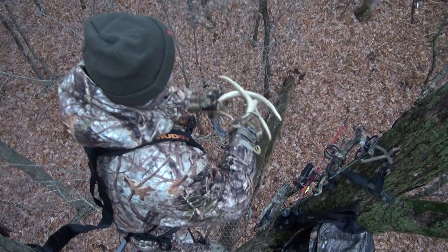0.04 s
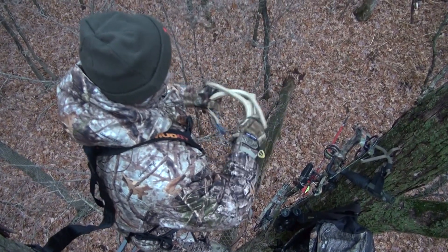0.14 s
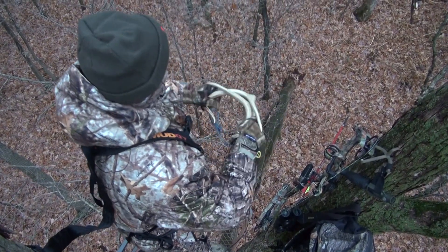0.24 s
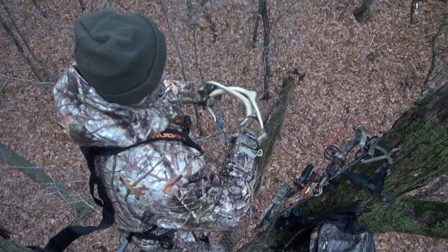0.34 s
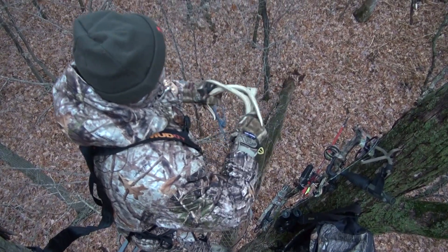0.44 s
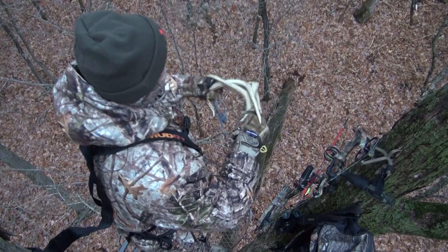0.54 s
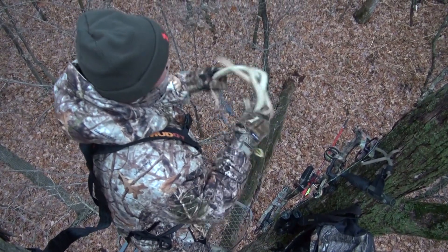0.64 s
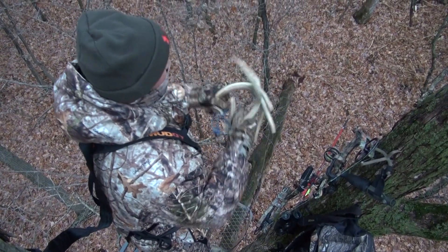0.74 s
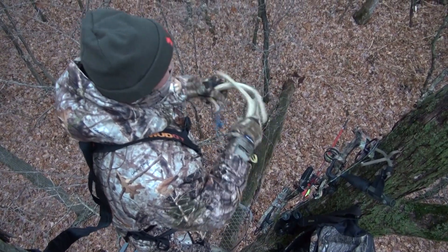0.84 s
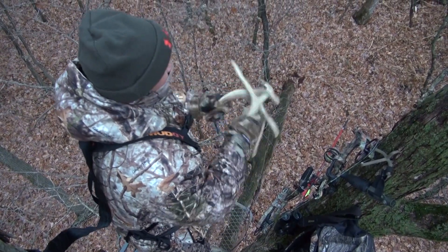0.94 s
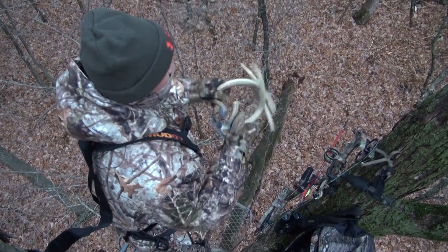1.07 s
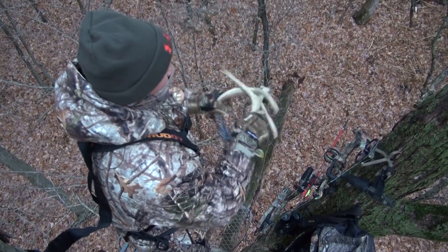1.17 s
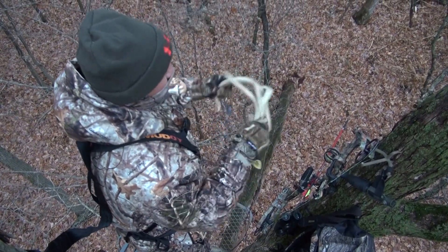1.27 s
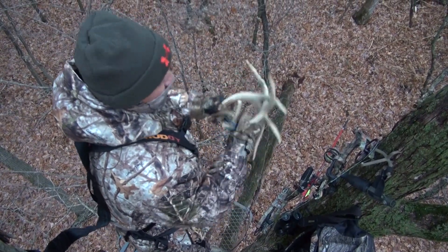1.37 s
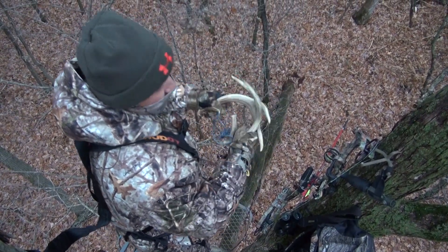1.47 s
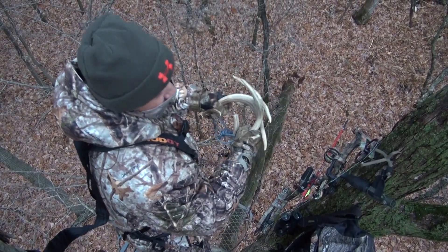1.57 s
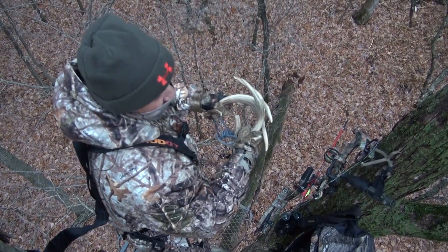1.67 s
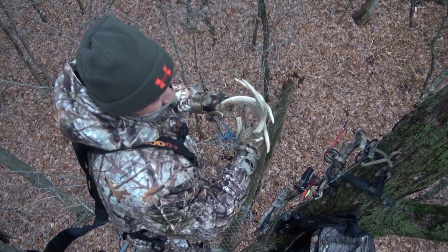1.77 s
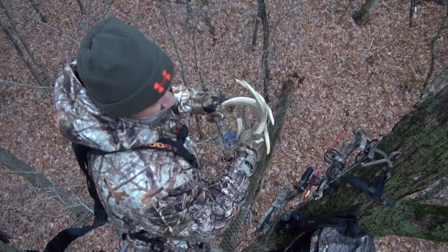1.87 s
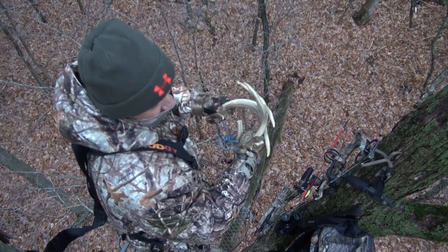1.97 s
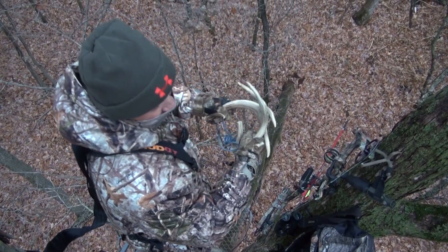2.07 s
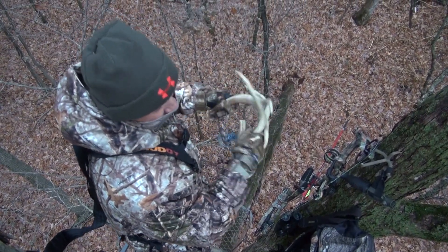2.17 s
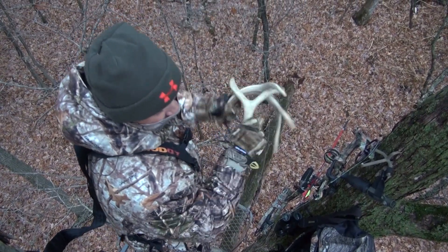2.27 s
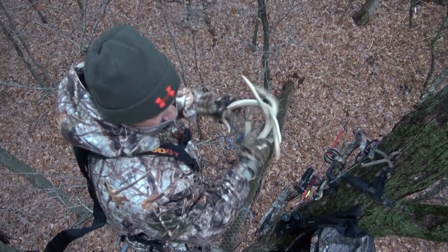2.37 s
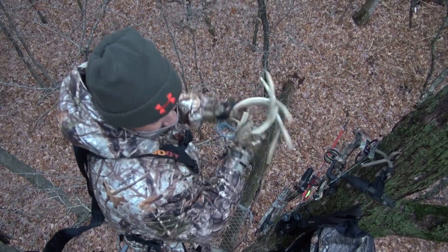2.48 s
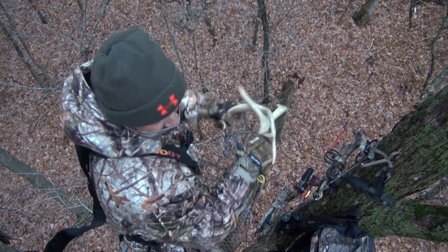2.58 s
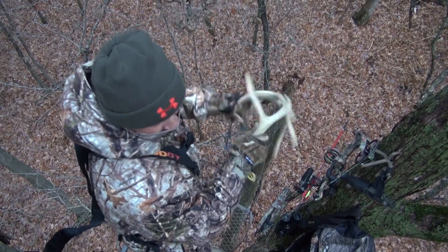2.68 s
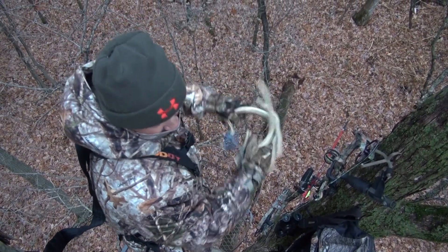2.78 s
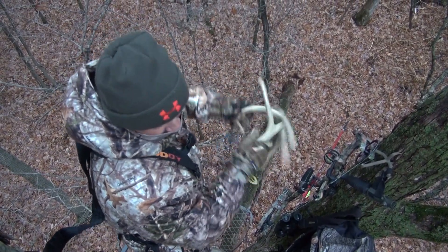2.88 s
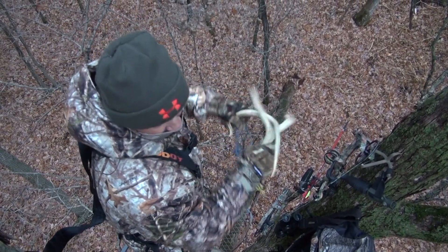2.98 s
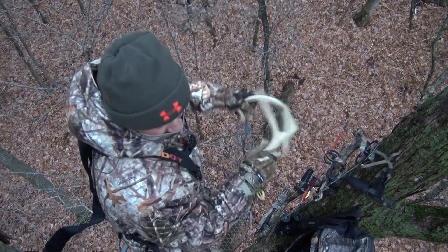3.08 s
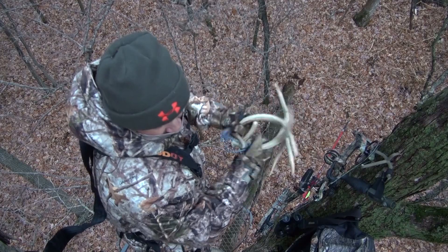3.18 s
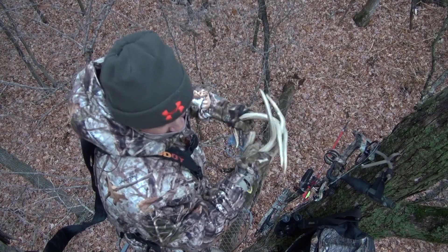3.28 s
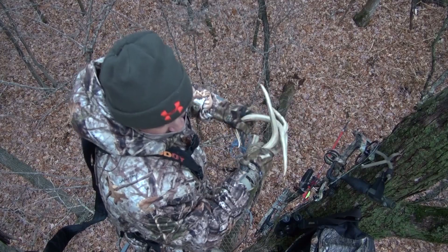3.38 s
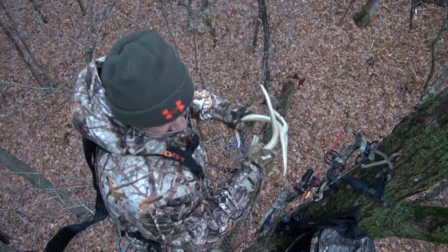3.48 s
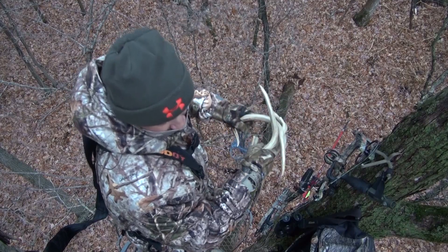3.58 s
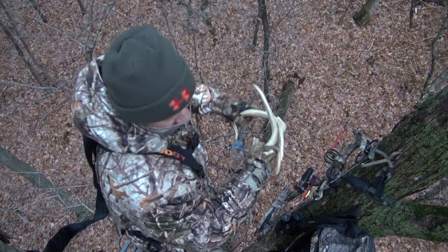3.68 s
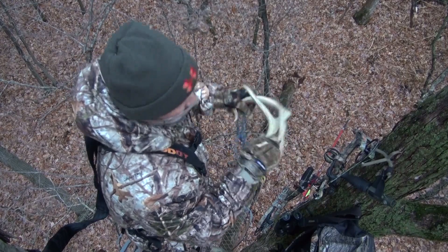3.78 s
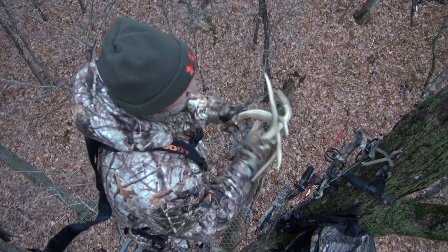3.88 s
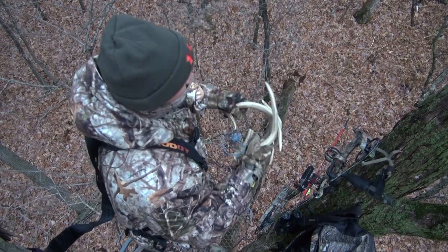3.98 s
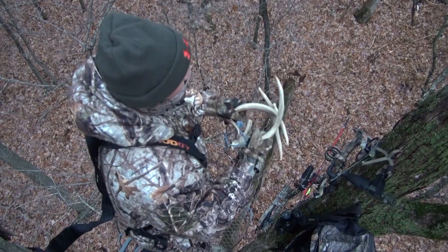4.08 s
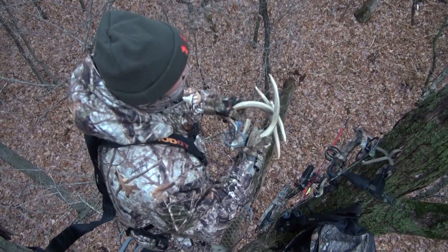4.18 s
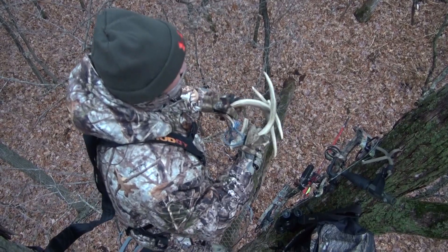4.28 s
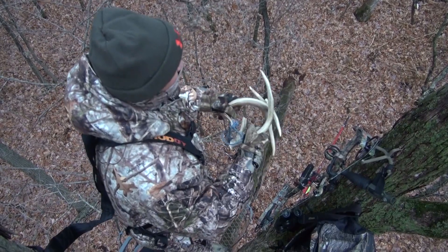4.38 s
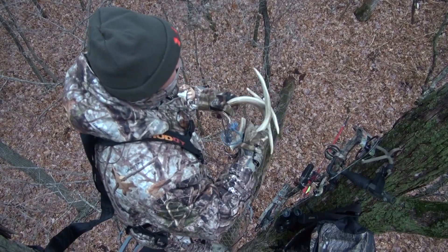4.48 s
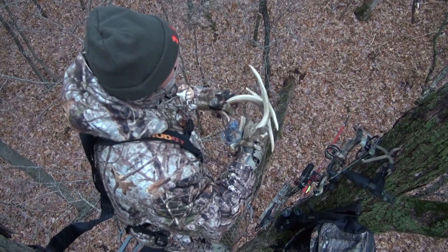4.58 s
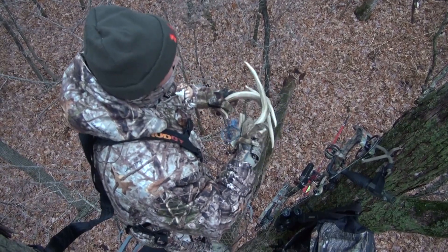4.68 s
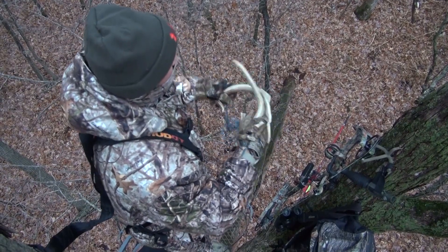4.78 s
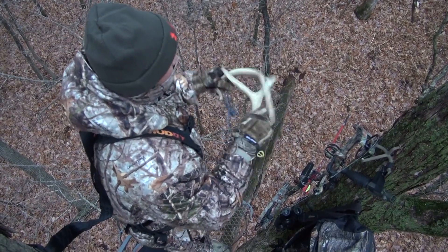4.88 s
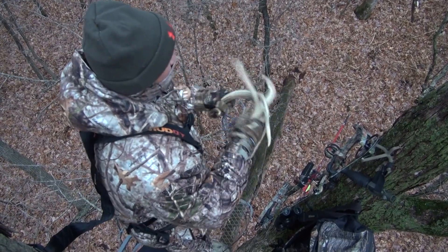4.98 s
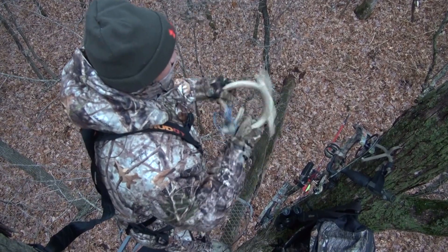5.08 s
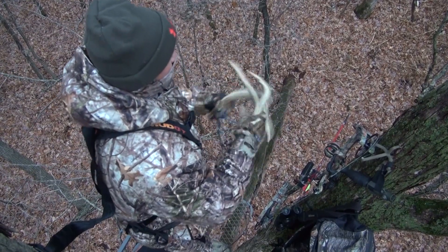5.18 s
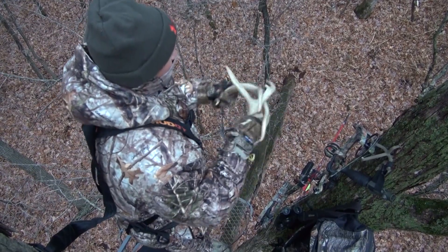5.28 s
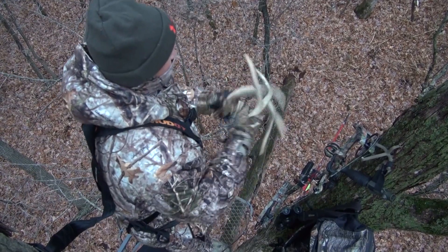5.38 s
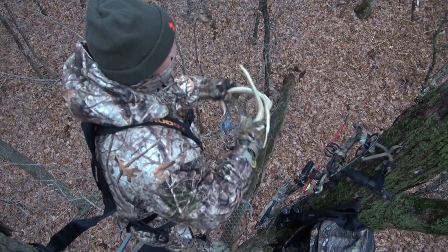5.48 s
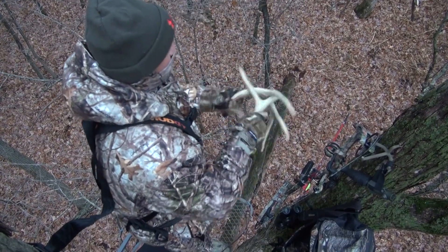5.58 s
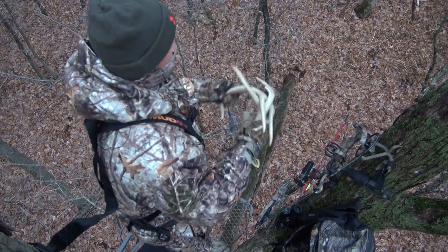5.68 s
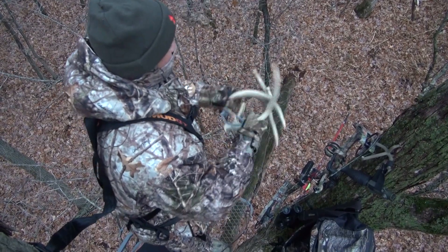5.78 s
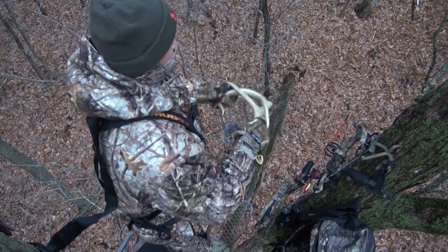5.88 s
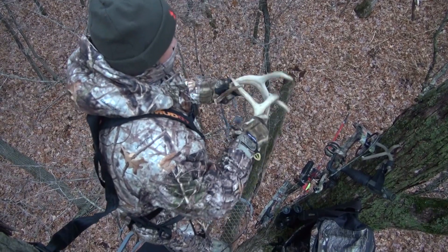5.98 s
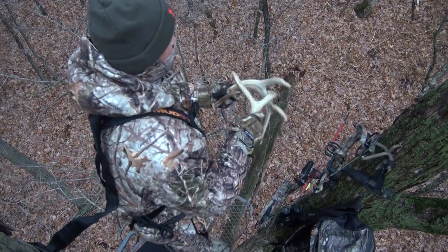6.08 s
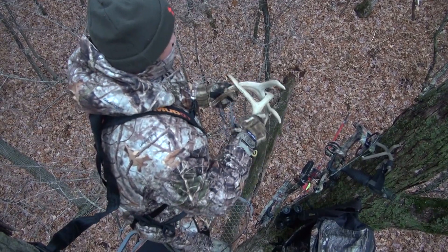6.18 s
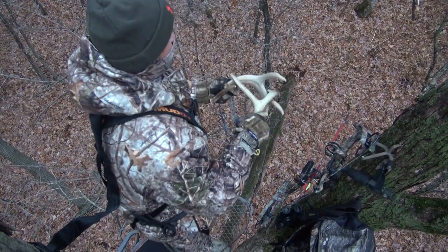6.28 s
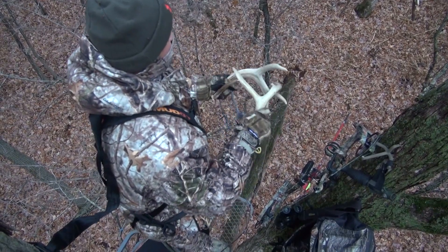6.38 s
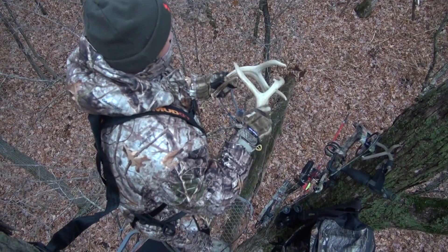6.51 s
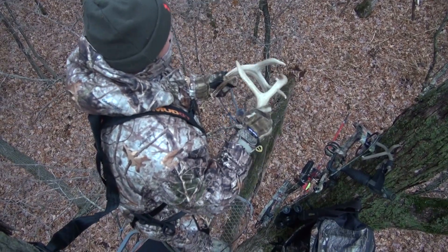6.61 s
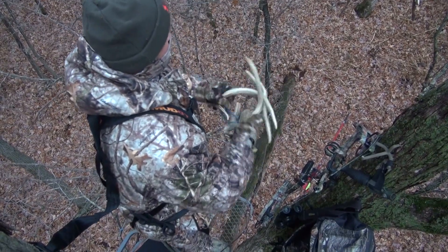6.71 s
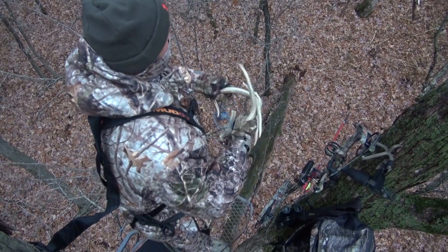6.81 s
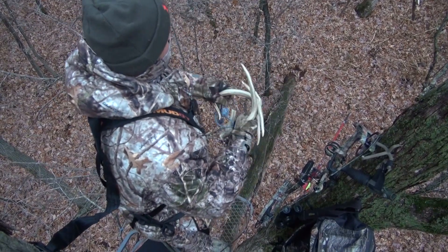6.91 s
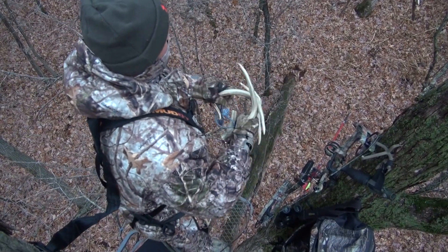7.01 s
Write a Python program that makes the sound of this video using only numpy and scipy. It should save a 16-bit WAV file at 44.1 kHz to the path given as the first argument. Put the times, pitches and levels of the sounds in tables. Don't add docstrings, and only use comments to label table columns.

```python
import sys
import numpy as np
from scipy import signal
from scipy.io import wavfile
from scipy.ndimage import uniform_filter1d

SR = 44100
rng = np.random.default_rng(int(sys.argv[2]) if len(sys.argv) > 2 else 0)


def level_to_linear(level):
    exponent = np.asarray(level, float) / 20
    return 10 ** exponent


def inscribe(sig):
    pcm = np.round(np.clip(np.atleast_2d(sig).T, -1, 1) * 32767)
    wavfile.write(sys.argv[1], SR, pcm.astype(np.int16))


N = 310905


def rms_one(x):
    return x / np.sqrt(np.mean(x ** 2) + 1e-20)


def in_time(rows):
    return np.interp(np.arange(N) / SR, *np.transpose(rows))


def band(x, low_hz, high_hz):
    edges_hz = [low_hz, min(high_hz, .45 * SR)]
    return signal.sosfilt(signal.butter(2, edges_hz, "band", fs=SR, output="sos"), x)


def drift(rate_hz):
    r = np.exp(-80 * np.pi * rate_hz / SR)
    noise = rng.standard_normal(N // 40 + 2002)
    slow = signal.lfilter([1], [1, -2 * r, r * r], noise)[2000:]
    return np.interp(np.arange(N) / 40, np.arange(len(slow)), rms_one(slow))


def coloured(spectrum, patchy_db, rate_hz):
    hz, db = np.transpose(spectrum)
    white = rng.standard_normal((2, N))
    octaves = np.log2(min(hz[-1], SR / 3) / hz[0])
    out = 0
    for k, low_hz in enumerate(hz[0] * 2 ** np.arange(0, octaves, .5)):
        level_db = np.interp(np.log(low_hz) + np.log(2) / 4, np.log(hz), db)
        gain = level_to_linear(level_db + patchy_db * drift(rate_hz))
        out = out + gain * band(white[k % 2], low_hz, low_hz * np.sqrt(2))
    return rms_one(out)


# (time [s], level [dB])
GUSTS = [(0.0, -63), (1.06, -51.5), (1.1, -60), (1.75, -51.5), (2.37, -60.5), (3.57, -61.5), (3.83, -55),
         (4.38, -60.5), (4.42, -41.5), (4.6, -40.5), (4.81, -44), (4.92, -54), (5.3, -63), (5.87, -47),
         (5.99, -63.5), (6.22, -53), (6.81, -53), (7.05, -61.5)]
# (frequency [Hz], density [dB per Hz])
RUMBLE_SPECTRUM = [(8.8, -46.5), (15, -21.5), (50, 1.5), (75, 4), (107, -1.5), (231, -32.5), (336, -38.5),
                   (420, -44.5), (550, -72.5), (920, -120)]


def breeze():
    rumble = coloured(RUMBLE_SPECTRUM, patchy_db=1.5, rate_hz=16)
    rumble = rumble / np.sqrt(uniform_filter1d(rumble ** 2, size=6000))
    return level_to_linear(in_time(GUSTS)) * rumble


# (frequency [Hz], density [dB per Hz])
HISS_SPECTRUM = [(120, -25.5), (200, -13), (340, -16), (700, -23), (1500, -29), (4000, -34.5),
                 (8000, -41.5), (11000, -44.5), (14500, -70.5)]


def woodland_hiss():
    return level_to_linear(-66) * coloured(HISS_SPECTRUM, patchy_db=-2.4, rate_hz=6.6)


def earlier_echo():
    start_db, t60_s = -58.5, 0.27
    fade = level_to_linear(start_db - 60 * np.arange(N) / SR / t60_s)
    return fade * rms_one(band(rng.standard_normal(N), 699, 5200))


# (time [s], level [dB], beam share [dB], tip share [dB], struck tine
# [Hz])
HARD_BLOWS = [(0.0646, -25.5, -3.5, -9.5, 1650), (0.0788, -12, -8, -9, 4150),
              (0.086, -22.5, -4.5, -18, 1677), (0.706, -27.5, 2.5, -22, 2710),
              (0.7107, -19.5, -15.5, -8, 1710), (0.725, -22, -0.5, -11, 3950),
              (0.739, -27, 3.5, -24.5, 3850), (0.7477, -18.5, -6, -10.5, 2360),
              (0.8388, -22, -6.5, -6.5, 2930), (0.8421, -23.5, -3.5, -34, 3080),
              (0.894, -31.5, 2, -8.5, 3160), (0.902, -17, -11.5, -5.5, 3600), (0.9589, -29, 3, -13, 3070),
              (1.019, -18, -4.5, -13, 2730), (1.188, -10.5, -1, -10, 3405), (1.266, -17, -1, -11.5, 3780),
              (1.279, -19, -8, -11.5, 2780), (1.348, -12.5, -20.5, -13, 3910), (1.3548, -19.5, 6, 1, 3310),
              (1.3626, -13.5, -21, -14.5, 2795), (1.39, -26, -8, -11.5, 4830),
              (1.4085, -11, -21.5, -4.5, 5200), (1.4171, -15.5, -6, -6.5, 1857),
              (2.3056, -12.5, -13, -16, 2876), (2.398, -17.5, -2, -4.5, 1219),
                (2.424, -25.5, 2, -13, 1357), (2.433, -26, -5.5, -9.5, 1880),
                (2.5462, -25, -6.5, -18, 2461), (2.5698, -14.5, -0.5, -5, 1140),
                (2.6234, -21.5, -12.5, -13.5, 1140), (2.6563, -22.5, -5, -14, 1140),
                (2.6785, -30, 7.5, 3, 5210), (2.7634, -18, -4, -27.5, 3296), (2.7715, -9.5, -7.5, -5, 3695),
                (2.9686, -14.5, -3, -12.5, 3103), (3.0418, -26, 7.5, -6.5, 1200),
                (3.0601, -21.5, -9, -2.5, 4644), (3.0748, -14, -3, -6.5, 2885),
                (3.103, -19.5, -13.5, -2.5, 5690), (3.185, -11, -12.5, -0.5, 4245),
                (3.1995, -16.5, -8.5, -4.5, 3223), (3.213, -17, -14, -11, 3523),
                (3.8944, -21, 3.5, -7.5, 3130), (3.901, -17, -14.5, -60.5, 2830),
                (3.9112, -14, 3.5, -5, 3764), (3.921, -11, -13, -12, 3214),
                (3.995, -18.5, -4.5, -10.5, 3010),
              (5.0015, -8.5, -1.5, -8, 2660), (5.016, -26.5, 2.5, -7, 1210),
               (5.0593, -20, -2, -11.5, 3790), (5.0723, -22, -5, -11, 1980), (5.0865, -25.5, 2, -4, 3020),
               (5.1488, -21, -5.5, -3, 4780), (5.166, -23.5, -23, -7, 2790), (5.1931, -19, 3.5, 3, 3310),
               (5.2049, -16, -7, -19, 3920), (5.2229, -17.5, -19, -13, 1140), (5.2305, -15, 7, -16, 3270),
               (5.2585, -12, -2, -11.5, 2950), (5.4449, -14, -3.5, -5, 5340),
               (5.598, -12.5, -2.5, -6.5, 4070), (5.716, -21, -4.5, -13, 2780),
               (5.721, -23.5, -14, -13, 2230), (6.0152, -25.5, -9.5, -4, 2180),
               (6.0709, -27, 6.5, -10, 1108), (6.1222, -27.5, -3, -7.5, 3050),
               (6.133, -28.5, -4, -40.5, 2787), (6.714, -16, -2, -3.5, 3825),
               (6.7224, -19, -0.5, -3.5, 3240), (6.73, -10.5, -4, -8, 3540),
               (6.7428, -7.5, 1.5, -11.5, 3017)]
# (time [s], level [dB],
# struck tine [Hz])
LIGHT_TOUCHES = [(0.0118, -50, 4440), (0.1675, -44.5, 1390), (0.211, -47.5, 1256), (0.643, -45.5, 1398),
                 (0.679, -46, 2274), (0.805, -39.5, 2965), (0.824, -41, 4280), (0.864, -43.5, 2840),
                 (0.873, -34, 3810), (0.979, -32.5, 3107), (1.0735, -32.5, 4000), (1.0919, -40.5, 3145),
                 (1.1297, -46, 4810), (1.1428, -36.5, 2030), (1.161, -38, 1686), (1.18, -41, 2214),
                 (1.212, -48.5, 1330), (1.317, -36, 3307), (1.3992, -33.5, 1308), (1.484, -43, 1410),
                 (2.2503, -36.5, 4340), (2.27, -39.5, 4750), (2.327, -26.5, 1710), (2.37, -40.5, 1460),
                (2.3779, -35.5, 1770), (2.3835, -31.5, 1000), (2.5517, -34, 2600), (2.5545, -22.5, 2780),
                (2.6622, -39.5, 1220), (2.698, -31, 5200), (2.7093, -34.5, 5730), (2.7402, -32, 2130),
                (2.7537, -30.5, 1740), (2.7943, -23, 3260), (2.8535, -42.5, 3960), (2.9099, -36.5, 1184),
                (2.9585, -40, 1140), (2.9835, -51, 1350), (3.023, -49.5, 2780), (3.0493, -36.5, 3600),
                (3.1219, -22, 4350), (3.1632, -24.5, 2780), (3.174, -25.5, 4750), (3.219, -30, 3840),
                (3.3151, -48, 1286), (3.5395, -52, 757), (3.7751, -50.5, 1290), (4.0829, -40.5, 1420),
                 (4.836, -40.5, 4500), (4.8513, -43, 1387), (5.0254, -23.5, 1150), (5.098, -30.5, 2920),
               (5.1108, -44.5, 3010), (5.1714, -33, 2990), (5.269, -23, 2770), (5.341, -58.5, 1000),
               (5.3622, -33, 2140), (5.3821, -35, 1100), (5.411, -51.5, 990), (5.431, -30.5, 2710),
               (5.464, -29.5, 4624), (5.5033, -36.5, 1720), (5.5355, -34.5, 3730),
                 (5.653, -30, 1190), (5.6739, -41.5, 2920), (5.677, -28, 2460), (5.7275, -30.5, 1360),
              (5.7444, -37, 2780), (5.771, -31, 5460), (5.788, -37.5, 2000), (5.8167, -41.5, 1410),
              (5.8221, -32.5, 2720), (5.8366, -37.5, 1265), (5.844, -42.5, 1303), (5.89, -42.5, 1186),
              (5.9002, -41, 1390), (5.9582, -42, 3740), (5.9707, -45.5, 2780), (6.0371, -34, 2800),
              (6.054, -42, 2530), (6.0586, -32.5, 2780), (6.0872, -32.5, 1200), (6.2848, -35.5, 1223),
              (6.2963, -40, 3010), (6.493, -62, 2820), (6.7537, -23.5, 1824),
                 (0.2266, -56, 1520), (0.986, -54.5, 1140), (1.2262, -41, 1300), (2.9207, -44, 1236),
                 (2.989, -46, 3080), (5.3184, -43, 894), (5.5155, -62, 770), (5.552, -48, 1070),
                 (5.8855, -41.5, 1370), (5.912, -44, 1148), (5.9203, -62, 1190), (6.1564, -48.5, 1190),
                 (1.0969, -43.5, 2803), (1.1462, -42.5, 2004), (2.346, -43, 1730), (2.395, -37.5, 2180),
                 (2.9934, -33, 3010), (5.7553, -31.5, 2780), (5.7931, -43.5, 2150), (6.0296, -35.5, 2780),
                 (6.0648, -37.5, 2150), (5.807, -46.5, 1353), (3.209, -23.5, 3800), (6.727, -18.5, 2780),
                 (5.0132, -22, 3800)]


def contacts():
    light = LIGHT_TOUCHES
    s, level_db, tine_hz = np.transpose(light)
    beam_db = -1 - 0.195 * (level_db + 35)
    tip_db = -13 + 5.5 * np.log2(tine_hz / 2000) - 0.28 * (level_db + 35)
    blows = np.transpose(HARD_BLOWS)
    return np.hstack([blows, [s, level_db, beam_db, tip_db, tine_hz]])


def favoured(hz, struck_hz):
    return np.exp(-(np.log(hz / struck_hz) / 0.054) ** 2)


# (frequency [Hz], level [dB], t60 [s])
BONE_MODES = [(346.5, -17.5, 0.12), (483, -14, 0.032), (667, -19, 0.035), (788.8, -6, 0.044),
              (963, -5, 0.034), (1140, -3, 0.045), (1335.5, -2.5, 0.036), (1460, -12.5, 0.073),
              (1739, -1.5, 0.031), (1985, -6.5, 0.031), (2160, -6, 0.045), (2446, -10, 0.025),
              (2780, -2, 0.028), (3010, -1.5, 0.034), (3310, 0, 0.016), (3830, -1, 0.017), (4194, 2, 0.016),
              (4721, 2.5, 0.018), (5250, -3.5, 0.013), (5435, 3, 0.012), (6170, -2.5, 0.015),
              (6450, -4.5, 0.015), (7080, -8.5, 0.022), (8400, -21.5, 0.0094), (9100, -23, 0.0057),
              (9400, -21, 0.005)]


def struck_modes(beam_db, tip_db, tine_hz, other):
    hz, mode_db, t60_s = np.transpose(BONE_MODES + BONE_MODES)
    first = np.arange(len(hz)) < len(BONE_MODES)
    low = np.clip(np.log(2000 / hz) / .5, 0, 1)
    high = np.clip(np.log(hz / 3800) / .4, 0, 1)
    middle = (hz > 1500) & (hz < 4500)
    chance = rng.standard_normal((4, len(hz), 1))
    strength, tuning, damping, phase = np.clip(chance, -1.7, 1.7)
    parts = [(tine_hz, 10.5, first)]
    if other is not None:
        parts += [(*other[1:3], ~first), (*other[3:5], ~first)]
    struck_db, owned, tuned_hz = 0, 0, hz * (1 + 0.014 * tuning[:, 0])
    for part_hz, part_db, antler in parts:
        owns = antler * favoured(hz, part_hz)
        struck_db = struck_db + 1.177 * part_db * owns
        owned = owned + owns * np.clip(part_db / 9, 0, 1)
        tuned_hz = tuned_hz * (part_hz / tuned_hz) ** owns
    owned = np.minimum(owned, 1)
    share = level_to_linear(mode_db - 4.0 * strength[:, 0] * owned + struck_db)
    share = share / np.sqrt(np.sum(share[middle] ** 2))
    share = share * level_to_linear(low * (1 - 0.51 * owned) * (beam_db + 3.0) + high * (tip_db + 3.0))
    pitch = np.float32(2 * np.pi * tuned_hz[:, None])
    linger = 1 + .9 * (low + 0.14) * owned
    decay = np.float32(np.log(1000) / ((t60_s * linger)[:, None] * np.exp(.25 * damping)))
    return share, pitch, decay, np.float32(4 * phase), low


def skidding(level_db):
    when, size = rng.random((2, 8))
    drag_s = .02 * level_to_linear(-.2 * (level_db + 10.5))
    skid = np.zeros(SR // 20)
    at = np.minimum((when * drag_s * SR).astype(int), len(skid) - 1)
    skid[at] = level_to_linear(-1.5 - 6.4 * size - 31.6 * when) * np.sign(size - when)
    skid[0] = 1
    return skid


def contact_crack(t, grit, rise, tip_db):
    fade = np.exp(-np.log(1000) * t / 0.017) + level_to_linear(-3.5) * np.exp(-t / 0.00077)
    return level_to_linear(tip_db + 1.0) * grit * rise * fade


def bone_ring(t, grit, rise, level_db, modes, skid):
    share, pitch, decay, phase, low = modes
    hits = np.flatnonzero(skid)
    summed = np.abs(np.exp(-1j * pitch * hits / SR) @ skid[hits])
    share = share * np.sqrt(np.sum(skid ** 2)) / np.maximum(summed, .45)
    sines = np.exp(-decay * t) * np.sin(pitch * t + phase)
    beams, tines = [share * low, share * (1 - low)] @ sines
    choke_s = 0.035 * level_to_linear(-1.27 * (level_db + 9.5))
    choke = np.exp(-(t / choke_s) ** 2)
    flutter = np.minimum(t / .02, .5) * rms_one(uniform_filter1d(grit[::-1], size=100))
    return rise * choke * (beams + tines * (1 + flutter))


# (time [s], beam mode [Hz], beam gain [dB], tine [Hz], tine gain
# [dB])
OTHER_ANTLER = [(0.065, 1672, 7, 3100, 10.5), (0.079, 1196, 10.5, 3070, -1.5), (0.086, 1200, 1, 3770, 2),
                (0.706, 1704, 2.5, 3120, -1.5), (0.711, 1580, 2, 2730, 9), (0.726, 1460, 8.5, 3010, 4.5),
                (0.738, 1460, 1.5, 3020, 6.5), (0.748, 890, -6, 2900, -0.5), (0.839, 1260, 3.5, 3240, 7),
                (0.844, 1073, -0.5, 2060, 2.5), (0.894, 1732, 7, 3830, 3.5), (0.901, 1165, 7, 2720, 6),
                (0.96, 1719, 7, 2745, 4), (1.019, 1383, 10, 2330, 8), (1.188, 1345, 6, 2970, 3),
                (1.265, 1460, 5.5, 2900, 0.5), (1.279, 1140, 4.5, 3700, 4.5), (1.348, 1633, -4.5, 2870, 4),
                (1.353, 1000, -3, 3700, 4), (1.363, 1760, 4.5, 3100, 5), (1.39, 1150, 1, 2950, -1),
                (1.408, 1791, 14.5, 2145, 10), (1.416, 1365, 2.5, 2270, 9),
                (2.307, 1686, -2.5, 2113, 4), (2.398, 1733, 3, 4118, 6.5), (2.424, 806, -3.5, 3210, 2.5),
                (2.432, 1720, 0, 2246, 5.5), (2.547, 1197, 1, 2750, 1.5), (2.57, 1397, -5, 3760, 11),
                (2.623, 1725, 4, 3010, 10), (2.656, 779, 11.5, 2780, 7), (2.679, 1140, 3, 3746, 2.5),
                (2.763, 1135, 9, 2198, 9.5), (2.772, 1368, 6, 4338, 13), (2.969, 1190, 8.5, 2060, 4),
                (3.042, 1090, 3.5, 3990, 10), (3.06, 1140, 7, 3698, 6.5), (3.075, 1620, 3.5, 2840, 6),
                (3.103, 1140, 7, 3060, 2), (3.185, 1300, -4.5, 3124, 2.5), (3.2, 1344, 0, 4565, 2),
                (3.213, 1415, 7, 3066, 8.5), (3.894, 1092, 0.5, 2000, -7), (3.901, 1100, -2, 2128, 13.5),
                (3.911, 1290, -12.5, 3010, 10.5), (3.921, 1665, 5.5, 3840, 5),
                (3.995, 1834, 15.5, 3770, -1.5),
                (5.002, 1704, 6.5, 2144, 8), (5.015, 1280, -2, 2128, 15), (5.059, 1400, 4, 2770, 3),
               (5.072, 1800, 6, 2980, -1), (5.086, 1813, 11, 2770, 13), (5.149, 1694, 9, 3600, 14),
               (5.165, 1723, 11, 3094, 12), (5.193, 1680, 12, 3900, 13), (5.205, 1000, 17, 3420, 6),
               (5.223, 970, -2, 2160, 7), (5.232, 1764, 10, 3230, 20.5), (5.258, 1380, 0, 3892, 12.5),
               (5.444, 1331, 2, 2710, 12), (5.598, 1700, 9, 2270, 26), (5.716, 801, 7, 2160, 8.5),
               (5.72, 1686, 24, 2680, 23), (6.015, 968, 5.5, 2247, 11), (6.071, 838, 13, 2665, 9.5),
               (6.122, 1840, 30, 2200, 0), (6.133, 1147, 7, 2090, -1), (6.714, 1098, 5.5, 4660, 5.5),
               (6.724, 1129, 7, 2915, 7), (6.73, 1590, 1.0, 2780, -3), (6.742, 1685, 6.5, 3210, 4.5)]


def clashes():
    others = OTHER_ANTLER
    t = np.arange(SR // 14, dtype=np.float32) / SR
    rings, cracks = np.zeros(N + SR), np.zeros(N + SR)
    for k, (s, level_db, beam_db, tip_db, tine_hz) in enumerate(contacts().T):
        at = int(np.round(s * SR))
        other = others[k] if k < len(others) else None
        modes = struck_modes(beam_db, tip_db, tine_hz, other)
        rise = 1 - np.exp(-t / (0.000064 * level_to_linear(-.35 * (level_db + 4.5))))
        grit = rng.standard_normal(len(t))
        skid = skidding(level_db)
        crack = contact_crack(t, grit, rise, tip_db)
        ringing = bone_ring(t, grit, rise, level_db, modes, skid)
        cutoff_hz = min(11000 * level_to_linear(0.31 * (level_db + 26.5)), SR / 2.25)
        soft = signal.butter(2, cutoff_hz, fs=SR, output="sos")
        ringing, crack = signal.sosfilt(soft, [ringing, crack])
        for layer, sound, later_db in ((rings, ringing, 0), (cracks, crack, -8.5)):
            sound = signal.fftconvolve(sound, np.r_[1, level_to_linear(later_db) * skid[1:]])
            layer[at:at + len(sound)] += level_to_linear(level_db + 2.0) * sound
    return band(band(rings[:N], 480, 14000), 250, 18000), band(cracks[:N], 840, 8300)


def ring(clicks, hz, t60_s):
    r, w = level_to_linear(-60 / (max(t60_s, .003) * SR)), 2 * np.pi * hz / SR
    return signal.lfilter([0, np.sin(w)], [1, -2 * r * np.cos(w), r * r], clicks + 1e-18)


# (time [s], level [dB])
RUB_STROKES = [
    [(0.05, -62.5), (0.2, -67), (0.3, -81)],
    [(0.6, -57), (0.684, -69.5), (0.822, -47.5), (0.898, -53.5), (1.02, -53)],
    [(1.06, -55.5), (1.234, -45), (1.3, -37), (1.338, -43.5), (1.456, -61), (1.52, -71)],
    [(2.22, -63), (2.314, -64), (2.456, -47.5), (2.52, -62)],
    [(2.56, -57), (2.694, -47.5), (2.792, -45.5), (2.93, -58.5)],
    [(2.97, -46), (3.082, -44), (3.154, -55.5), (3.294, -69.5), (3.35, -71)],
    [(3.88, -71.5), (4.022, -58.5), (4.14, -65)],
    [(5.0, -70), (5.05, -72.5), (5.17, -46), (5.27, -35)],
    [(5.29, -45.5), (5.43, -46)],
    [(5.46, -50), (5.59, -59.5)],
    [(5.62, -38), (5.7, -59.5)],
    [(5.73, -57.5), (5.87, -45.5)],
    [(5.882, -43), (5.98, -71)],
    [(6.0, -69.5), (6.104, -60), (6.2, -71.5)],
]


def rubbing():
    ticks_per_s, uneven_db, dull_db_per_octave, damped = 1300, 2.5, 6.5, 0.66
    level = 0
    for rows in RUB_STROKES:
        before, after = (rows[0][0] - .015, -120), (rows[-1][0] + .025, -120)
        level = level + level_to_linear(in_time([before] + list(rows) + [after]))
    sizes = level_to_linear(uneven_db * np.minimum(rng.exponential(1, N), 3)) * rng.choice([-1, 1], N)
    ticks = sizes * (rng.random(N) < ticks_per_s * level_to_linear(5 * drift(30)) / SR)
    dealt = rng.integers(0, 4, N)
    rings = 0
    for k, (hz, db, t60_s) in enumerate(BONE_MODES):
        gain = level_to_linear(db - dull_db_per_octave * np.log2(hz / 1000))
        rings = rings + gain * ring(ticks * (dealt == k % 4), hz, damped * t60_s)
    scrape = rms_one(band(rings, 600, 9000)) + level_to_linear(-18.0) * rms_one(band(ticks, 3000, 18000))
    return level * level_to_linear(-4.5) * scrape


# (frequency [Hz], level [dB], t60 [s])
WOOD_BANDS = [(513, -14.5, 0.2), (1000, -30.5, 0.42), (2060, -24.5, 0.53), (4073, -24.5, 0.5),
              (7497, -23.5, 0.21), (12000, -26.5, 0.15)]


def wood(x):
    first_s, rise_s, trunk_s, trunk_db = 0.011, 0.0023, 0.06, 6
    t = np.arange(SR) / SR
    swell = 1 - np.exp(-np.maximum(t - first_s, 0) / rise_s)
    swell = swell * level_to_linear(trunk_db * np.exp(-((t - trunk_s) / 0.01) ** 2))
    tail = 0
    for hz, level_db, t60_s in WOOD_BANDS:
        grains = rms_one(band(rng.standard_normal(SR), hz / np.sqrt(2), hz * np.sqrt(2)))
        tail = tail + level_to_linear(level_db - 37.5 - 60 * t / t60_s) * grains * swell
    return signal.fftconvolve(x, tail)[:N]


def clash_echo(rings, cracks):
    blurred = band(rings * rng.standard_normal(N), 490, 6500)
    echo = wood(level_to_linear(-9.5) * level_to_linear(3.0) * blurred + level_to_linear(-1.0) * cracks)
    shift_hz = 300 + 90 * drift(50)
    return np.sqrt(2) * echo * np.cos(2 * np.pi * np.cumsum(shift_hz) / SR)


def side_patches(mid):
    side = 0
    for low_hz in 400 * 2 ** np.arange(0, 5.2, .4):
        patch = np.clip(4 * (drift(23) - 1.0), 0, 1) * np.sign(drift(3))
        part = band(band(mid, low_hz, low_hz * 2 ** 0.49), low_hz, low_hz * 2 ** .4)
        side = side + level_to_linear(-18.5 + 4.0 * np.log2(low_hz / 2000)) * patch * part
    return side


def scene():
    rings, cracks = clashes()
    rings = rings + rubbing()
    air = breeze() + woodland_hiss()
    echo = clash_echo(rings, cracks) + earlier_echo()
    mid = rings + cracks + echo + air
    side = side_patches(mid) + level_to_linear(-48) * drift(40) * band(mid, 20, 400)
    return np.array([mid + side, mid - side])


def band_limit(x):
    return signal.sosfilt(signal.butter(12, 15570, fs=SR, output="sos"), x)


def record(dry):
    rounded = 1.2 * np.tanh(dry / 1.2)
    x = signal.sosfilt(signal.butter(7, 13100, fs=SR, output="sos"), rounded)
    smear = rng.standard_normal((1, 200)) * np.linspace(1, 0, 200) ** 2
    x = x + level_to_linear(-37) * signal.fftconvolve(x, smear[:, ::-1])[:, 199:]
    body = signal.sosfiltfilt(signal.ellip(8, .2, 40, 11700, fs=SR, output="sos"), x)
    top = x - body
    top_power = uniform_filter1d(np.mean(top ** 2, axis=0), size=300)
    gate = top_power / (top_power + level_to_linear(-67.0) ** 2)
    return band_limit(body + gate ** 2 * top)


dry = scene()
out = record(dry)
inscribe(out)
```